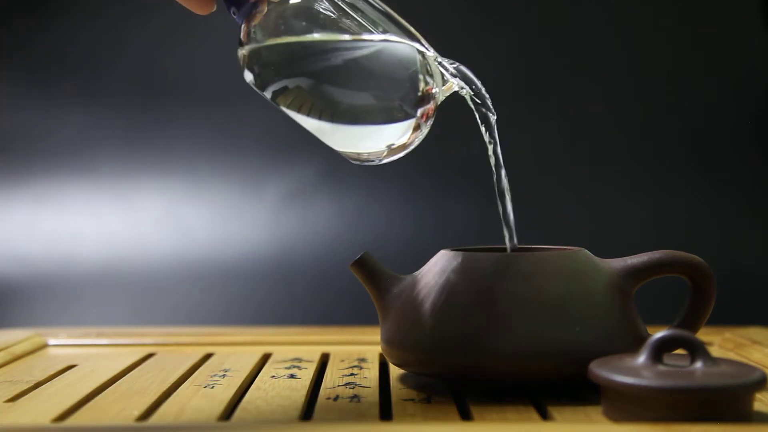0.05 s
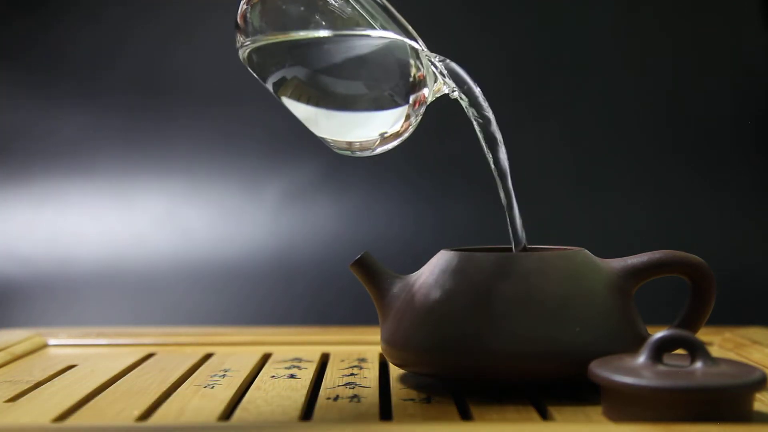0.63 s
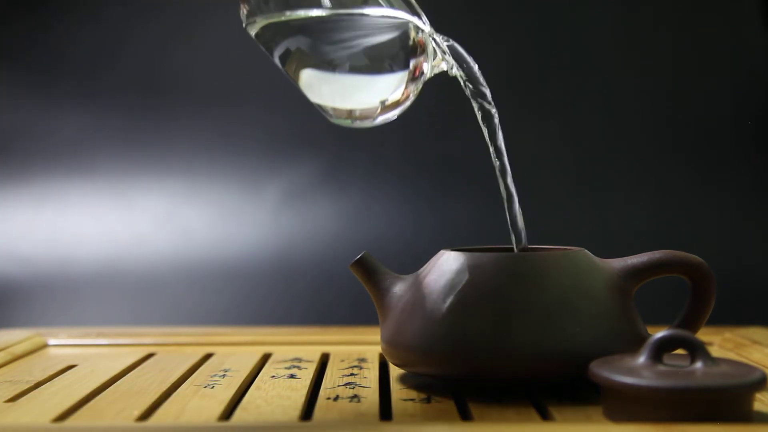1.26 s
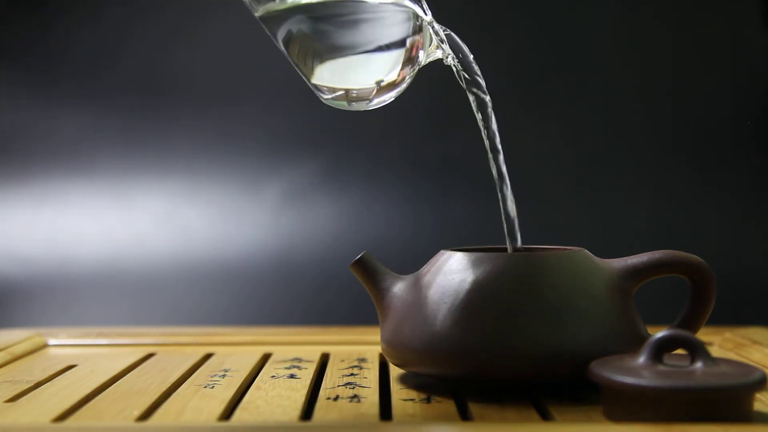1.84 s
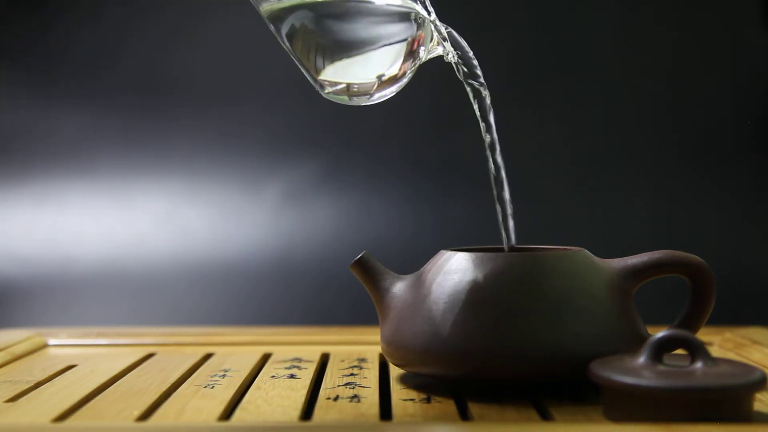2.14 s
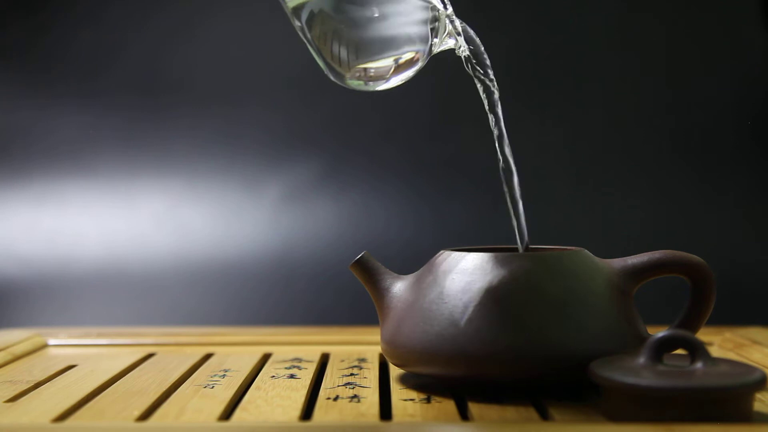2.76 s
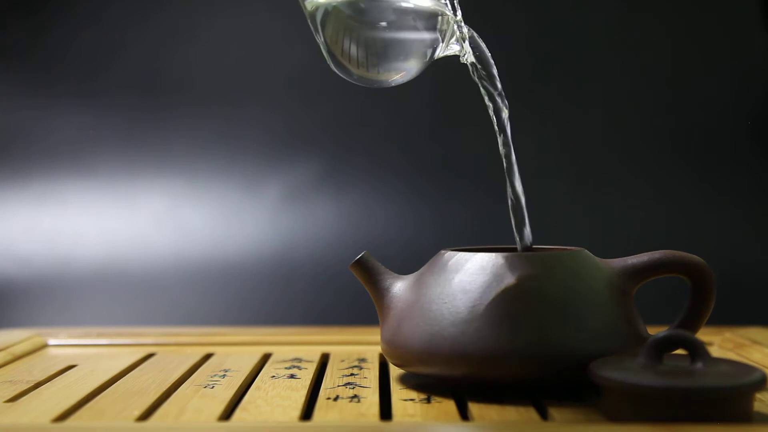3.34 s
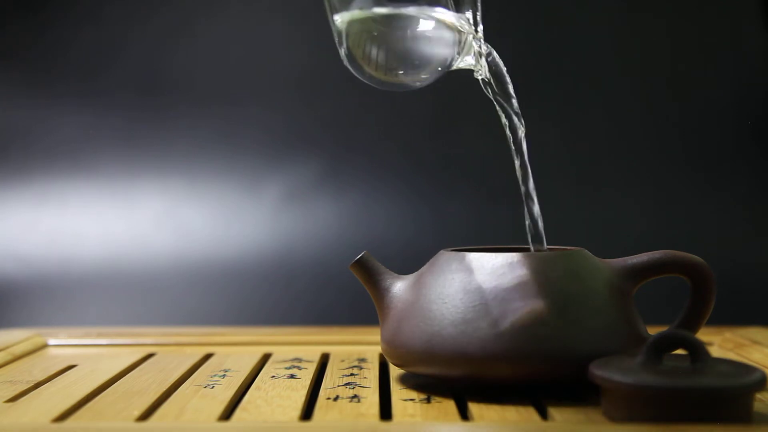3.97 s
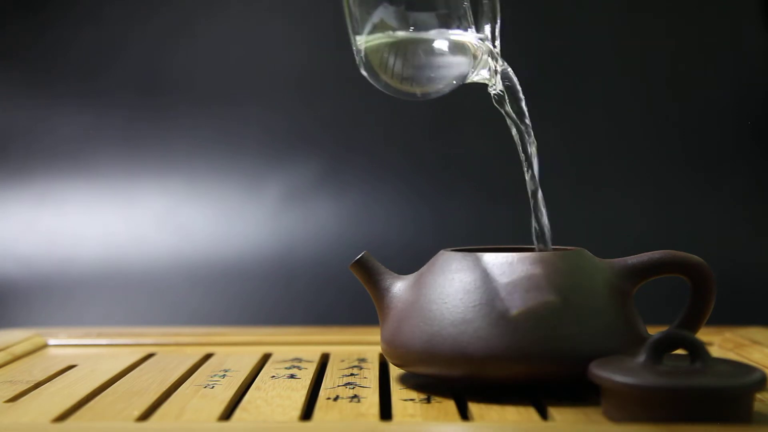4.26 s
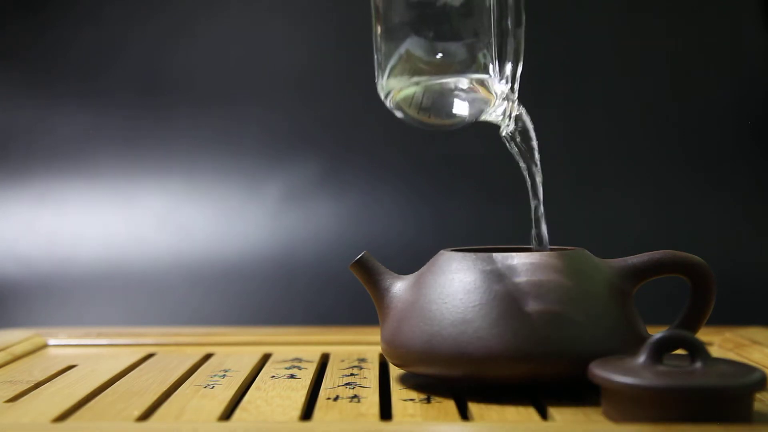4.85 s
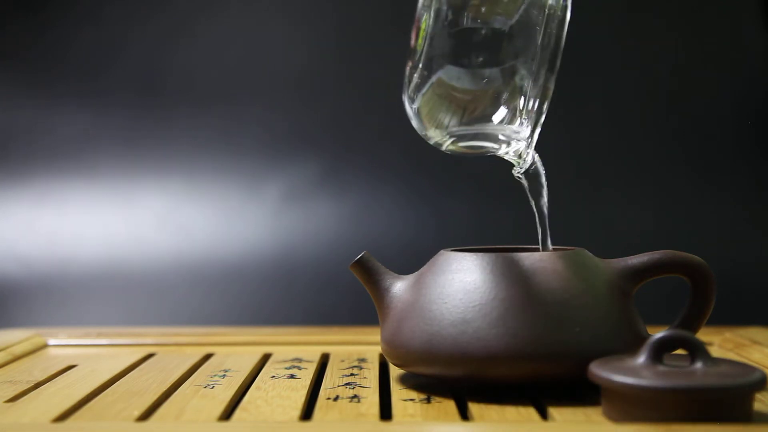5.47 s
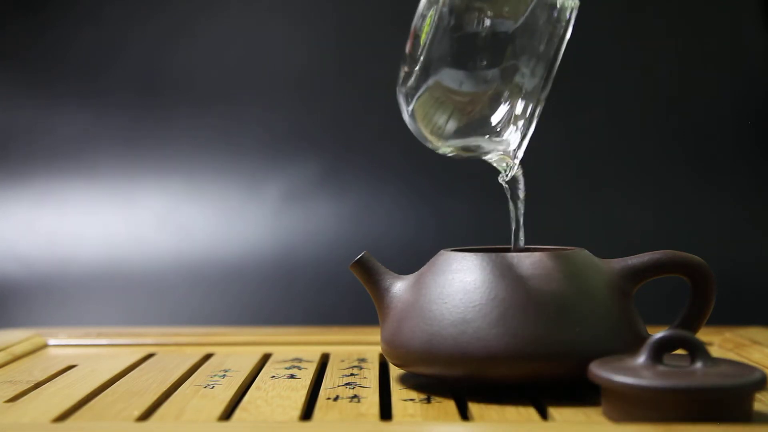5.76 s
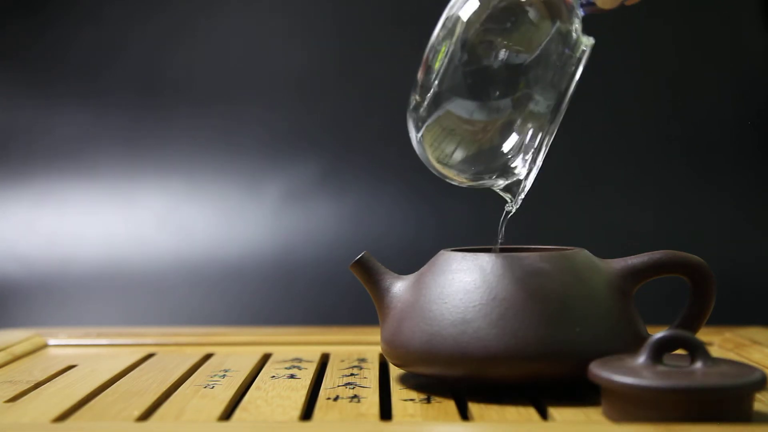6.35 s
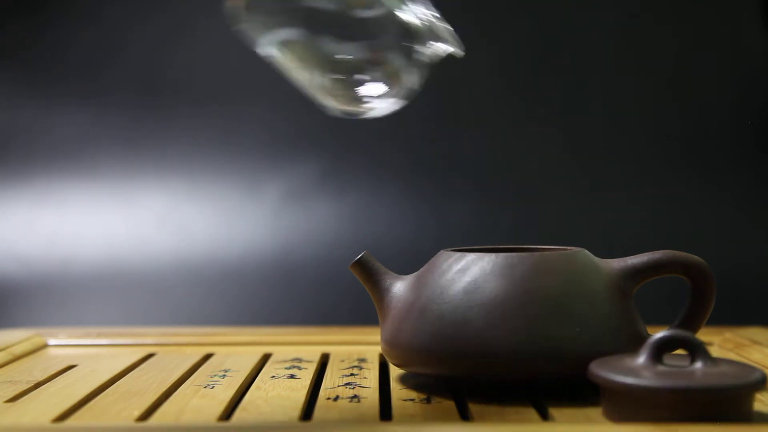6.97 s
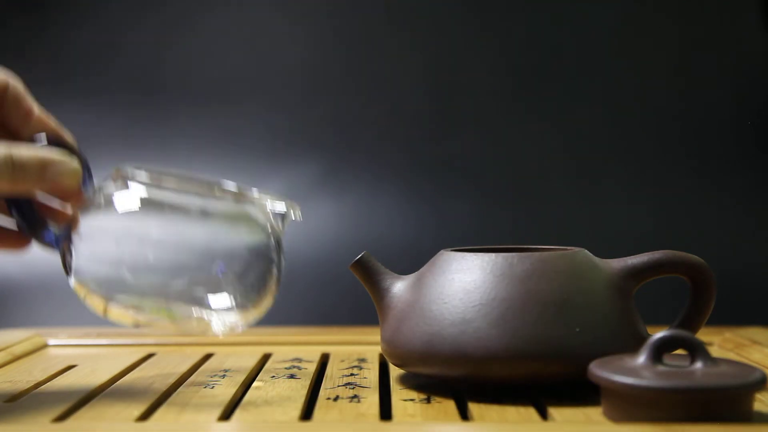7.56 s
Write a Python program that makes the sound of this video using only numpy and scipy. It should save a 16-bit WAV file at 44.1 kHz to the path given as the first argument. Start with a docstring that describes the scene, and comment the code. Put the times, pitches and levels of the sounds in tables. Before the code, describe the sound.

In a small, quiet room, water is poured into a clay teapot: first a delicate trickle with high plinks, then fuller bubbling with light splashes and hollow gulps, and finally a few drips. Before, during and after the pour, a tiny geared motor right beside the single microphone whirs, stutters and ticks, dry and close. Faint hiss and electrical hum lie underneath.

```python
"""First comes a small motor close to the microphone, probably a lens focusing: its gears whir and tick.
About a second in, water is poured from a glass pitcher into a clay teapot in a small room. The smooth
stream traps only tiny ringing bubbles, then breaks up, splashes and gurgles in the hollow of the pot,
thins out and ends in a few drips. One microphone hears it all, over faint hiss and hum."""
import sys
import numpy as np
from scipy import signal
from scipy.fft import rfft, irfft, next_fast_len
from scipy.io import wavfile
from scipy.ndimage import map_coordinates

SR = 44100
rng = np.random.default_rng(int(sys.argv[2]) if len(sys.argv) > 2 else 0)


def materialize(psi):
    """Save the field psi as 16-bit PCM at rate SR to the path in sys.argv[1].

    A 1-D psi becomes a single channel; in a 2-D psi each row is a channel.
    """
    bounded = np.clip(np.atleast_2d(psi).T, -1, 1)
    quanta = np.round(bounded * 32767).astype(np.int16)
    wavfile.write(sys.argv[1], SR, quanta)


N = 340011


def water():
    """The pour reaches the microphone straight from the pot's mouth and, softer, by way of the room."""
    bed = seething(clump_db=2.5, ping_db=-3)
    slaps = splashes(boost_db=8.5, rise_s=0.0012, t60=0.046, plop_db=-19.5)
    mouth = bed + slaps + single_bubbles(LOUD_BUBBLES + weaker_bubbles())
    return mouth + amp(-4.5) * room(mouth)


def bubble(t, hz, t60, rise, attack, hold=1):
    """Trapped air rings, rising in pitch as it nears the surface; hold over 1 lingers, then stops fast."""
    pitch = hz * (1 + rise * np.minimum(t / t60, 1))
    phase = 2 * np.pi * np.cumsum(pitch, axis=-1) / SR
    decay = np.exp(-np.log(1000) * (t / t60) ** hold)
    return np.sin(phase) * decay * (1 - np.exp(-t / attack))


# How a bubble's sound follows its size: (value at 1 kHz, power of the pitch)
RING_CYCLES, ATTACK_S = (42.6, 0.29), (0.0013, -0.6)
SNAP_GAIN, SNAP_T60_S, SNAP_WIDTH_RATIO = (0.53, 0.18), (0.09, -0.55), (0.81, -0.24)
# In the pot, the loudest gulps, plinks and last drips: (time [s], ring level [dB], pitch [Hz])
LOUD_BUBBLES = [(1.1185, -33.5, 6960), (1.2017, -34.5, 7530), (1.361, -35.5, 6640), (1.617, -29, 4330),
                (1.6625, -42.5, 10600), (1.8153, -21.5, 4420), (1.938, -28, 7070), (2.005, -33, 4500),
                (2.1173, -32.5, 7300), (2.1898, -32.5, 6840), (2.3098, -35.5, 3020), (2.3354, -34, 1500),
                (2.3584, -34, 3320), (2.4807, -28, 4400), (2.5828, -28.5, 6240), (2.7614, -37, 3060),
                (2.819, -31.5, 7780), (2.879, -32.5, 4380), (2.9465, -37, 13500), (2.985, -30, 4330),
                (3.028, -33, 1060), (3.054, -32, 7340), (3.087, -29, 1072), (3.185, -35, 3420),
                (3.26, -33, 1153), (3.3468, -32, 7240), (3.388, -33.5, 1076), (3.4735, -33, 4570),
                (3.5154, -33, 2940), (3.6458, -33, 3020), (3.7714, -31, 4670), (3.794, -31, 1215),
                (3.87, -28, 1097), (3.877, -20.5, 7060), (3.9908, -30, 7010), (4.108, -25.5, 6700),
                (4.111, -29.5, 1398), (4.223, -33.5, 1164), (4.273, -24.5, 1092), (4.289, -23, 1072),
                (4.293, -16, 6660), (4.314, -23.5, 1028), (4.3264, -41, 10220), (4.336, -31.5, 900),
                (4.3914, -31, 6600), (4.431, -24.5, 4540), (4.462, -34, 940), (4.483, -31.5, 1060),
                (4.506, -24, 4800), (4.5346, -27.5, 6180), (4.559, -30, 1108), (4.612, -28, 1046),
                (4.6163, -28.5, 7820), (4.633, -25, 1070), (4.692, -33, 1072), (4.694, -24, 5930),
                (4.702, -29.5, 904), (4.7323, -28, 6030), (4.8743, -32.5, 4420), (4.9039, -27, 6820),
                (4.9226, -27, 4360), (4.926, -30.5, 1190), (5.051, -27.5, 1080), (5.2076, -33, 4250),
                (5.306, -34, 1320), (5.437, -30.5, 6480), (5.8396, -37.5, 4980), (5.899, -37, 2820),
                (5.9192, -36.5, 6900), (6.1729, -39, 2060), (6.1962, -33.5, 1986), (6.2304, -29.5, 6580)]
def single_bubbles(rows):
    """Each bubble rings at its pitch; its pinch-off snaps and stirs the pot's nearby resonances."""
    out, t = np.zeros(N), seconds(SR // 5)
    for time, db, hz in rows:
        t60 = by_size(RING_CYCLES, hz) / hz
        ring = bubble(t, hz, t60, rise=0.0066, attack=by_size(ATTACK_S, hz), hold=1.55)
        burst = rng.standard_normal(len(t)) * fade(t, by_size(SNAP_T60_S, hz))
        width = hz * by_size(SNAP_WIDTH_RATIO, hz)
        snap = filtered(burst, lambda f: teapot(f) * resonances([(hz, width, 0)], f) ** 2)
        snap = by_size(SNAP_GAIN, hz) * snap / np.abs(snap).max()
        add(out, time, amp(db) * (ring / np.abs(ring).max() + snap))
    return out


def by_size(law, hz):
    """A bubble's property as a power law of its pitch."""
    at_1khz, power = law
    return at_1khz * (hz / 1000) ** power


def weaker_bubbles():
    """Faint spits, plinks and blips are scattered through the pour; low gulps come only at its height."""
    spits = strays(count=12, start=2.3, end=4.8, hz=10150, octaves=0.09, db=-50)
    plinks = strays(count=22, start=2.6, end=5.6, hz=6520, octaves=0.088, db=-37.5)
    blips = strays(count=13, start=2.3, end=5.2, hz=2940, octaves=0.052, db=-39.5)
    gulps = strays(count=6, start=4.35, end=5.05, hz=1096, octaves=0.09, db=-35.0)
    return spits + plinks + blips + gulps


def strays(count, start, end, hz, octaves, db, spread_db=3.1):
    """Bubbles scattered round one size: (time [s], ring level [dB], pitch [Hz])."""
    strength, detune = rng.standard_normal((count, 2)).T
    times = scattered(count, start, end)
    return list(zip(times, db + spread_db * strength, hz * 2 ** (octaves * detune)))


def swarm(count, low_hz, high_hz, cycles, rise, spread_db, samples):
    """A steady rain of bubbles of random pitch and strength, rms 1."""
    when, pitch, strength = rng.random((count, 3)).T[:, :, None]
    hz = low_hz * (high_hz / low_hz) ** pitch
    gain = amp(-spread_db * np.log(strength + 0.035))
    rings = gain * bubble(seconds(samples), hz, t60=cycles / hz, rise=rise, attack=1 / hz)
    place = (when * N).astype(int) + np.arange(samples)
    return unit(np.bincount(place.ravel(), rings.ravel(), N)[:N])


# Colour of the spray inside the pot: (frequency [Hz], gain [dB])
SPRAY_COLOUR = [(500, -2), (2500, 2), (5000, 0.5), (9500, 2), (14000, -3)]
# The broken stream slaps the water in the pot: (time [s], relative level [dB])
SLAPS = [(1.366, -44), (2.3252, -32), (2.82, -44), (3.037, -35), (3.1848, -32), (3.261, -36.5),
         (3.302, -33), (3.6752, -38.5), (4.1053, -25.5), (4.122, -32.5), (4.279, -38), (4.338, -34),
         (4.6965, -36.5), (5.114, -35.5), (6.2301, -40.5)]
def splashes(boost_db, rise_s, t60, plop_db):
    """Each slap throws a short spray of tiny bubbles into the hollow, over a dull plop of the surface."""
    envelope, t = np.zeros(N), seconds(SR // 6)
    for time, db in SLAPS:
        add(envelope, time, amp(db + boost_db) * fade(t, t60) * (1 - np.exp(-t / rise_s)))
    spray = swarm(14000, low_hz=955, high_hz=15800, cycles=9.2, rise=0.16, spread_db=6, samples=250)
    spray = np.gradient(spray)  # small, high bubbles radiate best
    spray = unit(filtered(spray, lambda f: amp(along(SPRAY_COLOUR, f))))
    plop = noise(lambda f: resonances([(1140, 8400, 0)], f) ** 2)
    return filtered(envelope * spray, teapot) + amp(plop_db) * envelope * plop


# Under the stream, where it lands: (time [s], fizz level [dB], burble level [dB])
SEETHE_LEVELS = [(.9, -58, -82), (1.5, -65, -71), (2.1, -56.5, -52.5), (2.6, -51, -55.5),
                 (3.05, -50.5, -46), (3.4, -53.5, -51.5), (3.7, -48, -52.5), (4.1, -57.5, -52),
                 (4.35, -52.5, -49.5), (4.9, -48.5, -47.5), (5.15, -53.5, -58.5), (5.6, -56.5, -54.5),
                 (6.3, -67, -87), (6.8, -66.5, -75)]
def seething(clump_db, ping_db):
    """Countless weak bubbles come in clumps and ring in the pot; a few ping above the rest."""
    times, fizz_db, burble_db = np.transpose(SEETHE_LEVELS)
    flowing = switched([(1.0, 6.8, 0)], ramp_s=0.16)
    clumps = unit(amp(clump_db * wobble(28))) * flowing
    fizz = swarm(5000, low_hz=3610, high_hz=10200, cycles=28, rise=0.05, spread_db=6.5, samples=400)
    pings = swarm(230, low_hz=4800, high_hz=8000, cycles=100, rise=0.02, spread_db=3, samples=1100)
    burble = swarm(1000, low_hz=1262, high_hz=3715, cycles=41, rise=0.09, spread_db=2.5, samples=1600)
    fizz, pings, burble = (unit(filtered(layer, teapot)) for layer in (fizz, pings, burble))
    fine = amp(np.interp(seconds(N), times, fizz_db)) * unit(fizz + amp(ping_db) * pings)
    coarse = amp(np.interp(seconds(N), times, burble_db)) * burble
    return clumps * (fine + coarse)


# The air inside the clay pot: (frequency [Hz], width [Hz], gain [dB])
POT_MODES = [(653, 1170, -11), (1120, 260, -1), (1350, 76, -1), (1920, 780, -8), (2536, 94, 0),
             (2862, 35, 2), (3003, 37, 5.5), (3540, 270, -3.5), (4240, 254, 1), (4764, 610, -0.5),
             (5740, 364, 2), (6580, 1480, -1), (7286, 300, 3.5), (8320, 540, -6), (9260, 96, -1),
             (9680, 660, -8.5), (11400, 1200, -8), (13100, 930, -5)]
def teapot(f):
    """Sound made inside the pot leaves through its air resonances."""
    return resonances(POT_MODES, f)


# The small room around the pot: (frequency [Hz], time to fall 60 dB [s])
ROOM_DECAY = [(300, 0.22), (1200, 0.24), (5000, 0.14), (8000, 0.16), (14000, 0.08)]
def room(x):
    """The tray and walls answer; the echo pattern shifts as the water moves in the pot."""
    out, block = np.zeros(N), SR // 4
    for start in range(0, N, block):  # a fresh random tail for each block
        hz, age, spectrum = signal.stft(rng.standard_normal(SR // 3), SR, nperseg=256)
        spectrum *= fade(age, along(ROOM_DECAY, hz)[:, None])
        _, tail = signal.istft(spectrum, SR, nperseg=256)
        echo = signal.fftconvolve(x[start:start + block], tail / np.linalg.norm(tail))
        add(out, start / SR + 0.002, echo)
    return out


# Close to the microphone, the motor at full speed: (start [s], end [s], level [dB])
MOTOR_RUNS = [(.521, 1.108, -48.5), (1.315, 3.617, -49), (3.736, 4.444, -53), (4.724, 6.427, -48.5),
              (6.501, 6.557, -48), (7.482, 7.721, -49)]
# The same motor creeping in fits and starts: (start [s], end [s], level [dB])
MOTOR_CREEPS = [(.03, .135, -59.5), (.185, .23, -55.5), (0.284, .35, -54.5), (.462, .495, -57),
                (1.1, 1.315, -53.5), (6.442, 6.499, -52.5), (6.662, 6.851, -53.5), (6.97, 7.087, -56),
                (7.171, 7.465, -53)]
# Colour of a creep: (frequency [Hz], gain [dB])
CREEP_COLOUR = [(200, 4.5), (600, -1.5), (1240, -6.5), (1550, 5), (1900, -5), (2550, 3.5), (3600, -2),
                (6000, -17)]
def motor(steps_per_s, step_depth, scatter_steps):
    """Gears rattle the housing while the motor runs; at a creep they stutter with a thinner colour."""
    run = switched(MOTOR_RUNS, ramp_s=0.0087) * noise(housing)
    run *= amp(wobble(70))  # the level flutters by about 1 dB
    steps = steps_per_s * seconds(N) + scatter_steps * wobble(steps_per_s / 2)
    stutter = unit(1 + step_depth * np.sin(2 * np.pi * steps))
    creep = noise(lambda f: housing(f) * amp(along(CREEP_COLOUR, f))) * stutter
    return run + switched(MOTOR_CREEPS, ramp_s=0.0028) * creep


# Colour of a jerk's rasp: (frequency [Hz], gain [dB])
RASP_COLOUR = [(300, -54), (1000, 2), (1250, -14), (1900, -1.5), (2600, -5), (4000, -3), (5500, 7),
               (9000, 26)]
# The motor's hardest jerks, dry and close: (time [s], relative level [dB])
HARD_JERKS = [(0.195, -39), (.3077, -44.5), (.5382, -36.5), (.6429, -36.5), (.7527, -44), (0.831, -39),
              (0.8832, -42), (0.917, -39), (0.9633, -40.5), (0.983, -37), (1.046, -39.5), (1.089, -40),
              (1.3838, -38), (1.5376, -35.5), (1.767, -36.5), (1.9046, -38), (1.9287, -38), (2.0622, -35),
              (5.3437, -34), (5.4824, -36), (5.685, -36.5), (5.8115, -39.5), (6.0537, -36), (6.197, -33.5),
              (6.2422, -37.5), (6.2914, -38.5), (6.337, -38.5), (6.5166, -37), (6.68, -37.5), (6.9158, -44),
              (7.231, -38.5), (7.2696, -38), (7.5388, -36.5), (7.642, -39.5)]
def ticks(typical_s, from_hz, to_hz, zip_db, rasp_db):
    """A jerk of the motor is a quickly falling zip and a rasp in the housing."""
    zips, envelope, t = np.zeros(N), np.zeros(N), seconds(SR // 40)
    rasp = noise(lambda f: housing(f) * amp(along(RASP_COLOUR, f)))
    for time, db in HARD_JERKS + twitches(chances=110, above_run_db=7, spread_db=2):
        onset = time - 0.001
        duration = typical_s * np.exp(rng.uniform(-0.28, 0.49))
        progress = np.minimum(t / duration, 1)
        swell = np.abs(np.sin(np.pi * progress)) ** 0.55
        pitch = from_hz + (to_hz - from_hz) * progress
        glide = np.sin(2 * np.pi * np.cumsum(pitch) / SR)
        add(zips, onset, amp(db + zip_db) * swell * glide)
        add(envelope, onset, amp(db + rasp_db) * swell)
    return zips + envelope * rasp


def twitches(chances, above_run_db, spread_db):
    """Lesser jerks come at random while the motor runs: (time [s], relative level [dB])."""
    times = scattered(chances, 0, N / SR)
    lifts_db = above_run_db + spread_db * rng.uniform(-1, 1, chances)
    return [(time, db + lift) for time, lift in zip(times, lifts_db)
            for start, end, db in MOTOR_RUNS if start < time < end]


# The motor's housing, beside the microphone: (frequency [Hz], width [Hz], gain [dB])
HOUSING_MODES = [(236, 140, -6.5), (473, 131, -4), (792, 134, -8.5), (1027, 67, -2), (1239, 72, 7),
                 (1393, 275, -3), (1526, 83, 2.5), (1809, 26, 2.5), (1933, 77, -0.5), (2306, 220, -8.5),
                 (2584, 273, -5.5), (3290, 200, -11.5), (3554, 185, -1.5), (4090, 110, -3.5),
                 (4340, 44, -3.5), (4576, 113, -9.5), (5000, 1060, -23)]
def housing(f):
    """The housing rings in steep-sided resonances whose powers add."""
    return np.sqrt(sum(amp(db) ** 2 * np.abs(resonances([(hz, width, 0)], f)) ** 4
                       for hz, width, db in HOUSING_MODES))


# Room tone and microphone hiss: (frequency [Hz], relative level per Hz [dB])
HISS_COLOUR = [(12, -12), (27, -1.5), (50, -9.5), (172, -3.5), (277, -6), (434, -8), (949, -14.5),
               (1760, -16.5), (4670, -18.5), (7110, -19), (9400, -21.5), (16000, -25.5)]
# Mains hum and a thin electronic whistle: (frequency [Hz], rms level [dB])
HUM_TONES = [(100, -65), (199, -71), (15639, -66.5)]
def background():
    """Room noise, microphone hiss and steady hum lie under everything."""
    hum = sum(amp(db) * np.sqrt(2) * np.sin(2 * np.pi * (hz * seconds(N) + rng.random()))
              for hz, db in HUM_TONES)
    hiss = amp(-57) * noise(lambda f: amp(along(HISS_COLOUR, f)))
    return hiss + hum


def amp(db):
    """Decibels to gain."""
    return 10 ** (np.asarray(db) / 20)


def unit(x):
    """x at rms 1."""
    return x / np.sqrt(np.mean(x ** 2) + 1e-20)


def along(points, hz):
    """(frequency [Hz], value) points read on a log axis."""
    frequencies, values = np.transpose(points)
    return np.interp(np.log(hz + 1), np.log(frequencies + 1), values)


def seconds(samples):
    """A time axis."""
    return np.arange(samples) / SR


def fade(t, t60):
    """A decay that falls 60 dB in t60 seconds."""
    return np.exp(-np.log(1000) * t / t60)


def add(track, time, sound):
    """Mix a sound into the track at a time in seconds."""
    start = max(round(time * SR), 0)
    part = track[start:start + len(sound)]
    part += sound[:len(part)]


def filtered(x, response):
    """x shaped by a frequency response, padded to let it ring out."""
    size = next_fast_len(len(x) + 8192)
    return irfft(rfft(x, size) * response(np.fft.rfftfreq(size, 1 / SR)), size)[:len(x)]


def resonances(modes, f):
    """Causal response of (frequency [Hz], width [Hz], gain [dB]) modes of alternating sign."""
    return sum((-1) ** k * amp(db) * 1j * f * width / (hz * hz - f * f + 1j * f * width)
               for k, (hz, width, db) in enumerate(modes))


def noise(response):
    """Coloured noise of rms 1."""
    return unit(filtered(rng.standard_normal(N), response))


def wobble(rate):
    """A smooth random curve, rate knots a second."""
    knots = rng.standard_normal(int(N * rate / SR) + 4)
    return map_coordinates(knots, [seconds(N) * rate])


def switched(rows, ramp_s):
    """A gain that is on during each (start [s], end [s], level [dB]) row."""
    t = seconds(N)
    return sum(amp(db) * np.clip(np.minimum(t - start, end - t) / ramp_s + 0.5, 0, 1)
               for start, end, db in rows)


def scattered(count, start, end):
    """Random moments that fill a stretch of time without long gaps."""
    return start + (end - start) * (np.arange(count) + rng.random(count)) / count


def scene():
    """One microphone in a small room: the pour with its echo, the motor close and dry."""
    room_tone = background()
    whir = motor(steps_per_s=36, step_depth=0.7, scatter_steps=0.43)
    pour = water()
    jerks = ticks(typical_s=0.008, from_hz=4550, to_hz=3400, zip_db=-6.5, rasp_db=-6)
    return (pour + whir + jerks + room_tone)[None]


def record(dry):
    """The recorder keeps nothing above 15.8 kHz."""
    return np.array([filtered(channel, lambda f: f < 15800) for channel in dry])


dry = scene()
out = record(dry)
materialize(out)
```